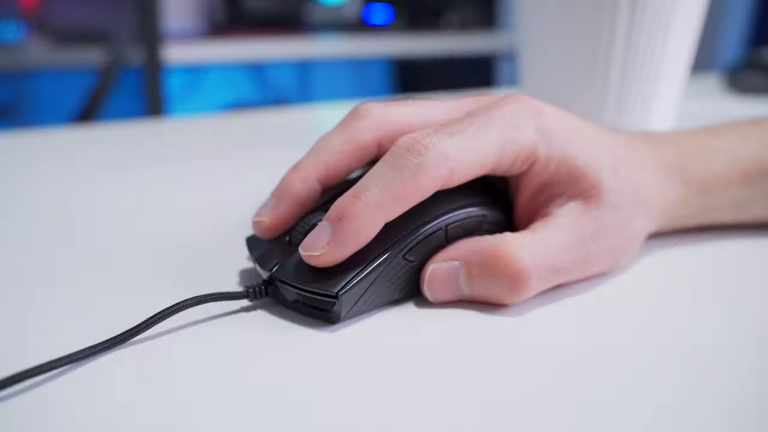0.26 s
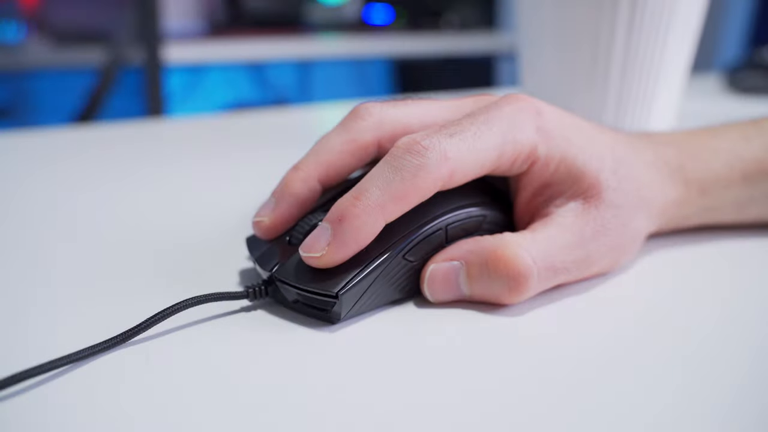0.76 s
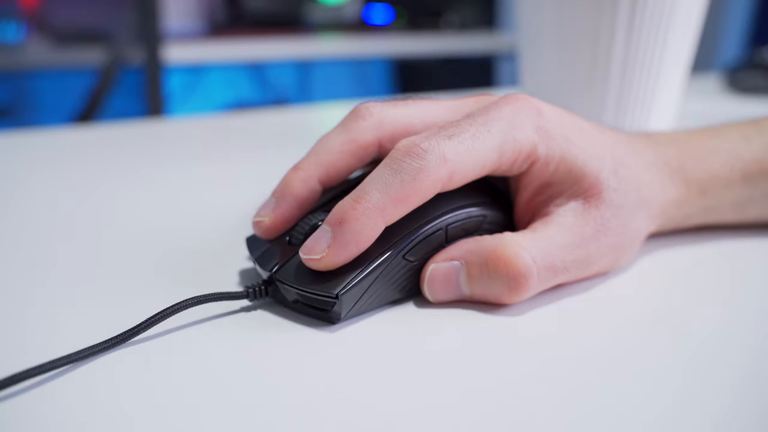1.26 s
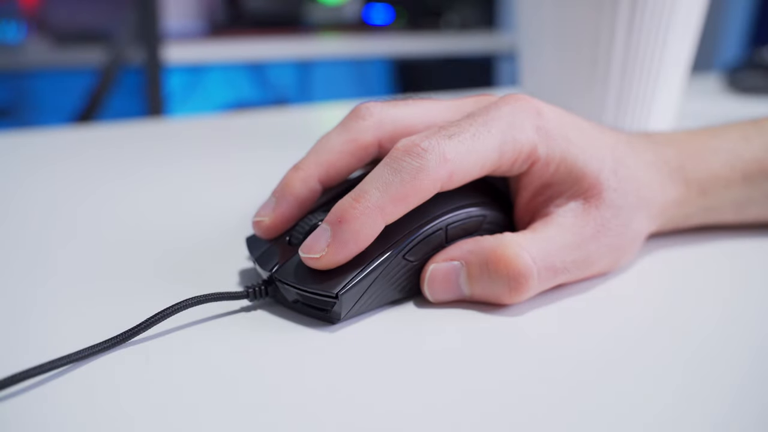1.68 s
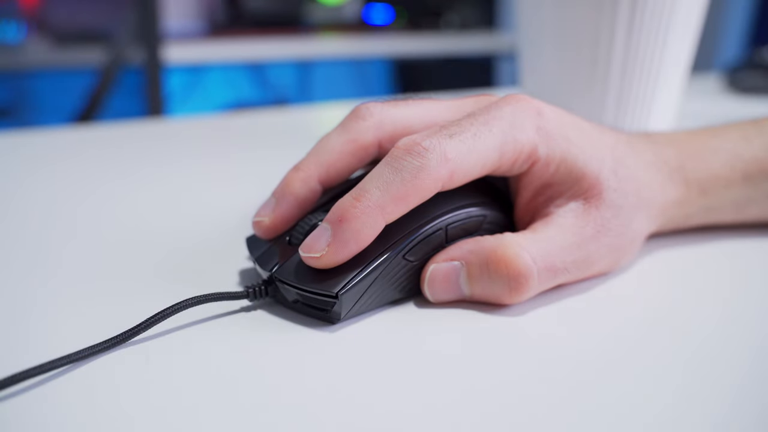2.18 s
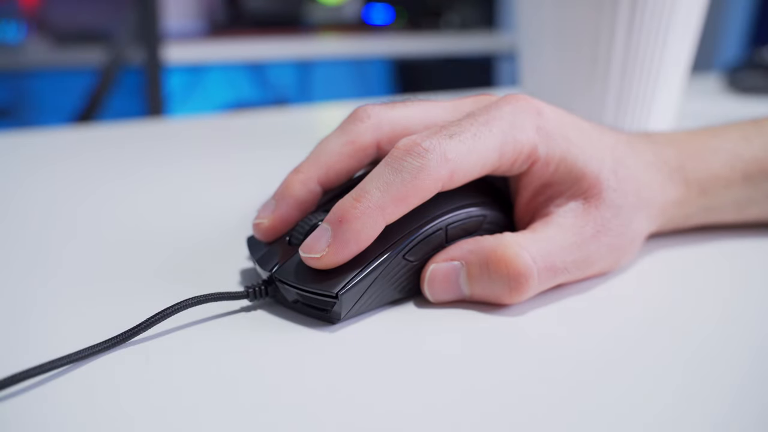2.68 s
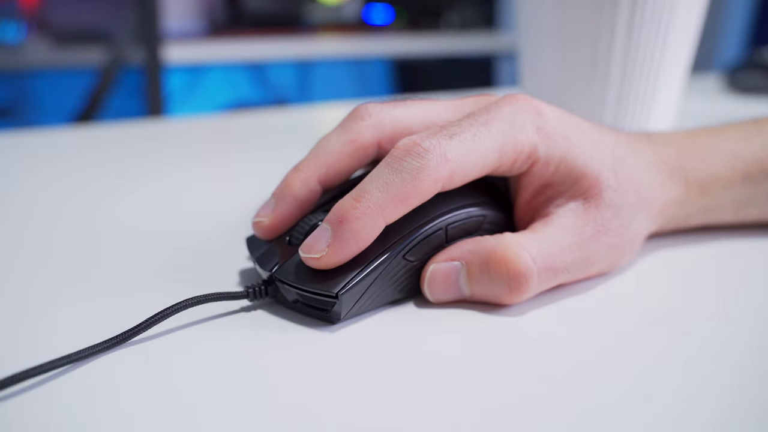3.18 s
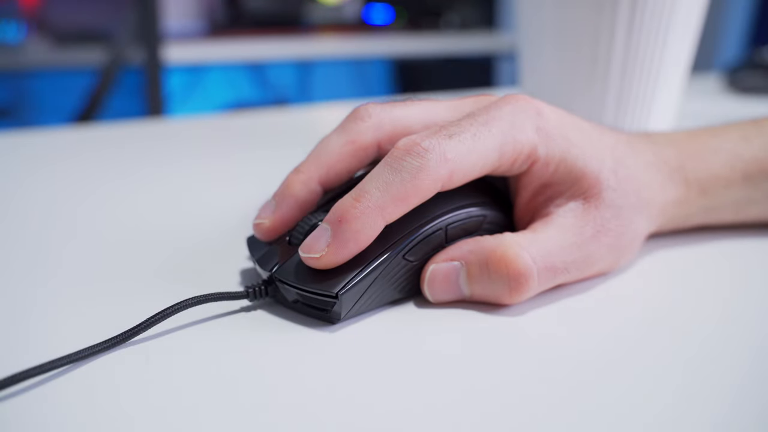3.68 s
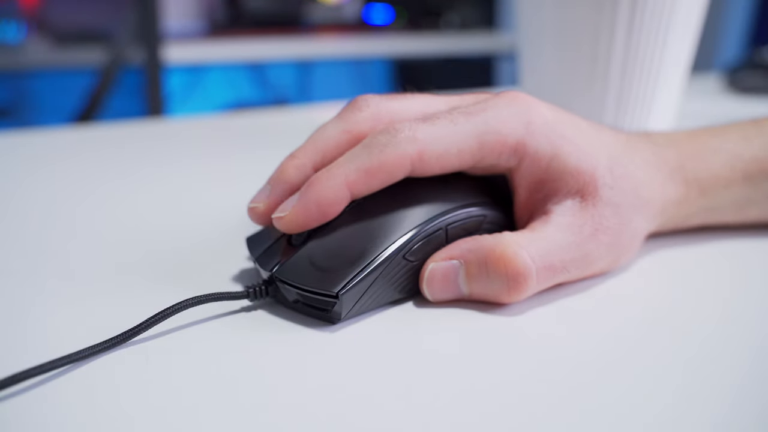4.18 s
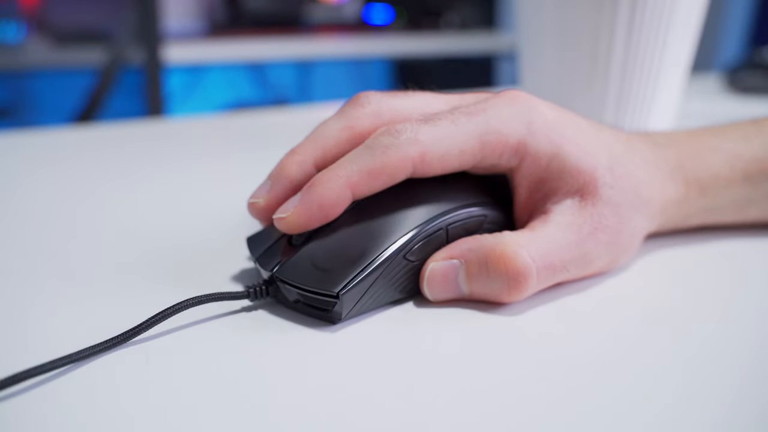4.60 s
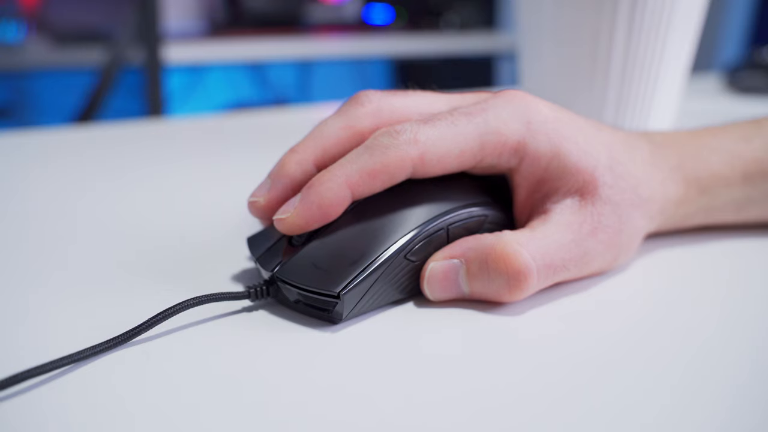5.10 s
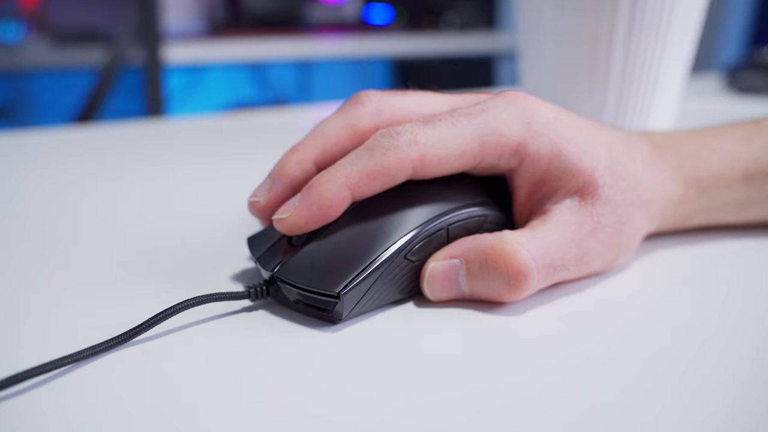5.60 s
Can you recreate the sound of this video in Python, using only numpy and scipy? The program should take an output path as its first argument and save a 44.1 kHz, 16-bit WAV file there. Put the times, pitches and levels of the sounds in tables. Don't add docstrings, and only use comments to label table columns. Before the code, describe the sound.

A wired plastic mouse on a desk is clicked steadily, close to the microphone in a small quiet room. Five bright left-button press-release pairs come first, then six slightly different right-button pairs, with faint skin pops between. A tiny finger slip precedes the last right release, then five duller, quieter wheel clicks follow over a faint constant fan hum.

```python
import sys
import numpy as np
from scipy import signal
from scipy.fft import rfft, irfft
from scipy.io import wavfile
from scipy.ndimage import uniform_filter1d

SR = 44100
rng = np.random.default_rng(int(sys.argv[2]) if len(sys.argv) > 2 else 0)


def amplitude_ratio(level_db):
    exponent = np.asarray(level_db, float) / 20
    return 10 ** exponent


def wav_out(sig):
    wavfile.write(sys.argv[1], SR, np.round(np.clip(np.atleast_2d(sig).T, -1, 1) * 32767).astype(np.int16))


N = 257984

# pitch_hz [Hz], level_db [dB per Hz]
AIR_SPECTRUM = [(20, -3), (45, -14), (90, -10.5), (180, -9.5), (250, -12), (370, -11), (495, -10.5),
                (520, -6), (640, -9.5), (680, -14), (790, -14), (900, -15.5), (1080, -15), (1200, -21),
                (1390, -18.5), (1450, -26.5), (3600, -32), (7000, -37), (15700, -37.5), (16000, -56)]
AIR_DB = -61.5
# pitch_hz [Hz], level_db [dB rms]
HUM_TONES = [(60.05, -59.5), (120, -74.5), (180, -71), (238.5, -78.5), (300, -77.5), (397.5, -84),
             (449.5, -79.5), (477.1, -80.5), (524.5, -73), (564.6, -69.5), (599.4, -71.5), (674.3, -83),
             (848, -76.5), (1829, -95)]
# pitch_hz [Hz], width_hz [Hz], level_db [dB rms]
FAN_TONES = [(340, 14, -78), (424, 5, -77), (540, 14, -77), (633, 8, -77), (1295, 40, -85), (1372, 25, -81),
             (1890, 20, -92), (2465, 5, -91), (3500, 250, -82)]

# pitch_hz [Hz], t60_s [s]
ROOM_T60 = [(300, 0.51), (1000, 0.16), (4000, 0.25), (6000, 0.33), (8000, 0.27), (16000, 0.21)]
# delay_ms [ms], level_db [dB over the diffuse tail]
ECHOES = [(9.7, 5), (10.8, 5), (13.2, 8), (14.6, 7.5), (17.3, 3), (19.7, 5), (27.4, 7.5), (29.3, 5),
          (33.5, 3)]
ROOM_START_MS, ECHO_SCATTER_MS = 9.5, 0.7
# delay_ms [ms], level_db [dB], low_hz [Hz], high_hz [Hz]
REPLIES = [(6.8, -8, 150, 700), (13, -14, 150, 700), (22.5, -11, 150, 700), (14.2, -28, 13000, 16800),
           (30, -16, 150, 500)]

SLIP_S, CREEP_S, CREEP_DB_PER_S, DRAG_S = 3.8765, 0.029, 600, 0.011
SLIP_DB, DRAG_DB = -55.5, -69
# start_s [s],
# level_db [dB peak], pitch_hz [Hz]
PEELS = [(0.582, -47.5, 945), (1.079, -51, 900), (1.426, -49, 910), (1.854, -52.5, 920),
         (2.064, -48.5, 810), (3.088, -52, 940), (3.561, -38, 896), (3.8745, -47, 5430),
         (3.8755, -56, 7700), (3.877, -48.5, 810), (3.876, -49, 130), (3.9325, -45, 890),
         (3.9775, -64, 2600), (4.2597, -49.5, 1070), (4.4115, -66, 4800), (4.4253, -67, 4400),
         (4.43, -67, 4300), (4.4315, -66, 5700)]
PEEL_SWELL_S, PEEL_PARTS = 0.0024, [(1, 2.5), (1.75, -13), (2.4, -18)]

# pitch_hz [Hz], level_db [dB], t60_s [s]
LEFT_DOWN_MODES = [(198, -30, 0.024), (583, -35.7, 0.0283), (727, -30.4, 0.0126), (1349, -18.6, 0.0046),
                   (1659, -35.3, 0.03), (2053, -43.1, 0.017), (2078, -24.7, 0.0032), (2734, -18.4, 0.0167),
                   (3151, -36.6, 0.014), (3195, -59.9, 0.0046), (3544, -22.9, 0.0072), (3631, -27.1, 0.017),
                   (4041, -20.4, 0.0165), (4342, -15.7, 0.0093), (4903, -19.5, 0.015),
                   (5520, -18.9, 0.0081), (6239, -24.8, 0.0108), (6700, -24, 0.006), (7317, -13, 0.0117),
                   (7866, -4.4, 0.0081), (8564, -6.9, 0.0064), (9275, -23.5, 0.0081),
                   (10159, -20.6, 0.0073), (10521, -10.1, 0.0032), (12577, -6.9, 0.0099),
                   (13602, -14.9, 0.0063), (14349, -11.6, 0.0063), (15105, -14, 0.0034),
                   (15800, -22, 0.003)]
LEFT_UP_MODES = [(196, -35.5, 0.028), (560, -35.7, 0.03), (782, -36.0, 0.0265), (1208, -27.0, 0.0062),
                 (1280, -33.9, 0.03), (1619, -39.5, 0.03), (2195, -30.5, 0.015), (2427, -20.2, 0.017),
                 (2826, -25.4, 0.0168), (3261, -28.4, 0.0093), (3582, -35.3, 0.017), (3849, -39.6, 0.017),
                 (4087, -34.3, 0.017), (4620, -21.3, 0.006), (5207, -37.2, 0.017), (5794, -31.0, 0.005),
                 (6031, -27.7, 0.017), (6805, -10.4, 0.0046), (8367, -5.3, 0.003), (9366, -9.2, 0.0031),
                 (9479, -25.1, 0.0099), (10349, -12.6, 0.007), (11427, -3.2, 0.004), (12482, -17.0, 0.0077),
                 (13245, -24.9, 0.0117), (14090, -21.0, 0.0096), (14917, -6.7, 0.0069),
                 (15222, -11.6, 0.0071), (16150, -27, 0.005)]
RIGHT_DOWN_MODES = [(173, -35, 0.025), (589, -25.5, 0.0142), (964, -22.4, 0.0038), (1694, -28.0, 0.0067),
                    (2003, -23.2, 0.0056), (2193, -29.2, 0.017), (2528, -27.6, 0.0048),
                    (2812, -34.4, 0.017), (2851, -34.0, 0.017), (3562, -18.5, 0.0061),
                    (4039, -15.3, 0.0092), (4568, -16.8, 0.015), (5201, -18.2, 0.0055),
                    (5472, -28.5, 0.0099), (5806, -33.2, 0.0134), (6432, -21.0, 0.011),
                    (7147, -7.7, 0.0126), (7880, -8.7, 0.0116), (9107, -37.2, 0.017), (9321, -24.7, 0.01),
                    (9891, -16.6, 0.0047), (10763, -20.0, 0.0062), (12479, -13.4, 0.008),
                    (13270, -21.1, 0.0059), (13603, -33.2, 0.017), (14158, -25.9, 0.0067),
                    (14749, -21.8, 0.0046), (15654, -17.6, 0.007)]
RIGHT_UP_MODES = [(252, -41.6, 0.03), (525, -28.8, 0.0138), (1012, -22.8, 0.0047), (1674, -36.0, 0.0178),
                  (2146, -33.4, 0.0089), (2690, -22.7, 0.0154), (2801, -19.6, 0.0101), (2875, -24.2, 0.017),
                  (3692, -21.0, 0.017), (4133, -23.0, 0.0099), (4541, -32.3, 0.017), (5230, -22.4, 0.0094),
                  (5760, -27, 0.012), (7149, -2.2, 0.0135), (7818, 0.4, 0.0077), (8850, -11.5, 0.007),
                  (9213, -32.8, 0.0137), (10121, -24.3, 0.0044), (10364, -28.8, 0.0077),
                  (11005, -30.4, 0.0098), (11626, -18.9, 0.003), (12413, -19.2, 0.0086),
                  (12948, -15.0, 0.0082), (13361, -18.6, 0.0083), (13616, -32.0, 0.0153),
                  (14335, -19.8, 0.0069), (14917, -22.2, 0.0121), (15506, -27, 0.0062), (3380, -31, 0.008)]
WHEEL_DOWN_MODES = [(28, -36, 0.0104), (354, -15.5, 0.0036), (687, -42.6, 0.0299), (983, -25.6, 0.0175),
                    (1296, -33.6, 0.0134), (1730, -43.6, 0.03), (1769, -40.1, 0.0127), (2165, -29.1, 0.017),
                    (2596, -10.6, 0.0105), (2948, -2.5, 0.0081), (3349, -6.2, 0.0041), (3797, -24.4, 0.017),
                    (4130, -23.0, 0.0076), (4796, -15.5, 0.0096), (5301, -28.5, 0.017),
                    (6022, -16.1, 0.0101), (7504, -9.0, 0.0068), (8185, -26.1, 0.0106),
                    (8585, -19.3, 0.0143), (10046, -18.3, 0.0107), (10477, -28.0, 0.0169),
                    (10697, -20.3, 0.0067), (10880, -18.3, 0.0076), (11692, -11.5, 0.003),
                    (13131, -28.4, 0.0099), (14182, -18.4, 0.0036), (14988, -21.5, 0.003),
                    (15250, -37.0, 0.0085)]
WHEEL_UP_MODES = [(328, -19.2, 0.0099), (551, -22.4, 0.0063), (980, -31.0, 0.0257), (1257, -32.2, 0.0125),
                  (1760, -33.4, 0.0233), (1787, -27.7, 0.009), (2124, -23.5, 0.0167), (2516, -13.7, 0.017),
                  (2856, -19.4, 0.017), (2941, -14.4, 0.0118), (3547, -10.7, 0.0031), (4102, -21.2, 0.0107),
                  (4787, -12.7, 0.0113), (5239, -21.4, 0.017), (6053, -9.6, 0.0086), (6820, -11.5, 0.0056),
                  (7584, -10, 0.017), (8282, -15.3, 0.0073), (8589, -18.5, 0.0149), (9054, -17.9, 0.0068),
                  (9555, -21.8, 0.0138), (10425, -18.2, 0.0088), (11009, -22.4, 0.0135),
                  (11466, -15.4, 0.0068), (12262, -14.5, 0.0104), (13257, -31.5, 0.0097),
                  (14193, -31.3, 0.0058), (15524, -27.5, 0.0084)]
# pitch_hz [Hz], level_db [dB], t60_s [s]
LEFT_DOWN_THUD, LEFT_UP_THUD = (110, -46, 0.03), (100, -46, 0.03)
RIGHT_UP_THUD, WHEEL_DOWN_THUD = (114, -43, 0.03), (173, -32, 0.05)
# delay_ms [ms after first touch], level_db [dB]
LEFT_DOWN_BOUNCES = [(0.0, -2.9), (0.31, 2.0), (0.51, 0.9), (1.0, -21.7), (1.63, -12.3)]
LEFT_UP_BOUNCES = [(0.0, -4.7), (0.3, 4.4), (0.51, 2.8), (1.0, -4.9), (1.56, -13.7)]
RIGHT_DOWN_BOUNCES = [(0.0, -1.3), (0.2, 2.8), (0.55, -3.1), (0.93, -12.7), (2.28, -23.4)]
RIGHT_UP_BOUNCES = [(0.0, -0.3), (0.31, 2.6), (0.5, 2.1), (0.94, -5.7), (1.6, -30.0)]
WHEEL_DOWN_BOUNCES = [(0.0, -8.5), (0.31, -0.2), (0.5, 2.5), (1.02, -12.0), (1.63, -28.4)]
WHEEL_UP_BOUNCES = [(0.0, -11.9), (0.3, 3.2), (0.5, -0.3), (1.0, -15.1), (1.59, -29.8)]
# pitch_hz [Hz], level_db [dB per Hz]
LEFT_DOWN_SPREAD = [(250, -12), (600, -5), (1100, -15), (1510.0, -6.5), (1680.0, -14), (1890.0, -16),
                    (2500.0, -14), (3600, -5), (4300.0, 1.5), (4950.0, -4), (5640.0, -2.5), (6030.0, -10.1),
                    (6930.0, -9), (7280.0, -6), (7580.0, -6), (7880.0, -4), (8830.0, -11), (9730.0, -15),
                    (10720.0, -15), (11800.0, -12), (12300.0, -4), (13520.0, -12), (14210.0, -10),
                    (14600.0, -23), (15250.0, -15), (15760.0, -20), (16050, -44.5)]
LEFT_UP_SPREAD = [(250, -31), (600, 2), (1100, -1), (1510.0, -8), (1680.0, -18), (1890.0, -12.5),
                  (2200.0, -8), (2500.0, -13), (4130.0, -2), (5300.0, -8.5), (6120.0, -3), (6550.0, -7.5),
                  (7280.0, 4), (7970.0, -13), (8350.0, 1), (8790.0, -11), (9650.0, -3), (10810.0, -13.5),
                  (11630.0, 2), (12020.0, -5.5), (12360.0, -20.5), (12750.0, -6), (13390.0, -8),
                  (15200.0, -7), (15760.0, -19.5), (16050, -44)]
RIGHT_DOWN_SPREAD = [(250, -33), (600, -2.5), (1100, -11.5), (1510.0, -11.5), (1640.0, -13),
                     (2150.0, -11.5), (3140.0, -11.5), (3700.0, 0.5), (4180.0, 1.2), (4740.0, -2),
                     (5600.0, -7), (7580.0, -10.5), (8010.0, 0.3), (9090.0, -15), (9730.0, -9.4),
                     (10850.0, -8.5), (11760.0, -26), (12060.0, -13.5), (12490.0, -13), (12880.0, -13.5),
                     (14080.0, -9), (14560.0, -16), (15370.0, -18.5), (15630.0, -6.5), (15760.0, -18),
                     (16050, -49)]
RIGHT_UP_SPREAD = [(250, -15), (600, -5.5), (1100, -8), (1510.0, -14), (2670.0, -14), (3320.0, -13),
                   (3650, 3.5), (4100, 0), (4440.0, -5), (4950.0, -17), (5300.0, -6.5), (5860.0, -10),
                   (6240.0, -14.5), (6900, -5), (7320.0, -0.5), (7800, -1.5), (8350.0, -3), (8910.0, -14.5),
                   (10080.0, -14.7), (10470.0, -22), (12140.0, -12), (13780.0, -11), (14170.0, -10),
                   (14560.0, -22), (14990.0, -23), (15330.0, -21.7), (15590.0, -21.5), (15760.0, -18.5),
                   (16050, -42)]
WHEEL_DOWN_SPREAD = [(250, -33), (600, 0), (1100, -2), (1510.0, -35), (1680.0, -15), (2240.0, -9),
                     (3490.0, -5), (4260.0, -0.5), (5170.0, -4), (5770.0, 2.5), (6850.0, -10), (7360.0, -6),
                     (7620.0, -11), (8740.0, -12), (9000.0, -17), (9350.0, -6), (9820.0, -0.5),
                     (10550.0, -9), (11020.0, -11), (11970.0, -11.7), (13090.0, -29), (14250.0, -18.5),
                     (14940.0, -28.5), (15550.0, -27.8), (15760.0, -34.1), (16050, -45)]
WHEEL_UP_SPREAD = [(250, -24.5), (600, -15), (1100, -10), (1510.0, -19), (1720.0, -21), (2200.0, -6.5),
                   (3530.0, -9.5), (4260.0, -2.5), (5730.0, 0.8), (7360.0, -14), (9000.0, -4.5),
                   (9560.0, -4), (9860.0, -18), (10340.0, -11), (11200.0, -11), (11500.0, -6),
                   (11760.0, -12.2), (12140.0, -10.2), (12620.0, -26), (13260.0, -21.4), (13570.0, -31),
                   (14250.0, -26), (15290.0, -33), (15590.0, -24.1), (15760.0, -27.5), (16050, -45)]
# start_s [s], level_db [dB], treble_db [dB], top_db [dB], middle_db [dB]
LEFT_DOWN = [
    (-0.22, -13, 4, 7, 0),
    (0.1477, -15, 1, -3, 0.5),
    (0.5531, -15.0, 1, -2, .4),
    (0.9198, -14.5, 2, 0.5, 0.6),
    (1.2647, -15, 1, -2.5, 0.2),
    (1.6317, -15.5, 1.2, -.6, 0.2),
]
LEFT_UP = [
    (-0.09, -15, 0, 0, 0),
    (0.2716, -14.5, 0.1, 0.19, 0.34),
    (0.706, -15, 0.1, .3, 0.37),
    (1.0507, -15, 0.2, .6, 0.72),
    (1.3987, -14.5, 0.077, 1.2, 0.21),
    (1.7845, -15.5, -0.3, 1.2, 1.1),
]
RIGHT_DOWN = [
    (2.0413, -13, -0.62, 1.2, -0.032),
    (2.396, -13.5, -0.5, .3, 0.33),
    (2.7352, -13, 0.2, 0.43, -0.85),
    (3.0588, -13.5, 0.22, -1.2, -0.067),
    (3.395, -13, 0.8, -1.5, -0.48),
    (3.7399, -13.5, -0.86, .3, 0.16),
]
RIGHT_UP = [
    (2.1803, -14, 1.8, -4.5, 0.4),
    (2.5389, -13.5, 0.38, -2, 0.14),
    (2.8808, -14, 1.1, -5, -1.4),
    (3.2154, -14, 2, -4, -1.4),
    (3.5373, -13.5, 0.76, 1, -1.2),
    (3.9008, -13, -1.1, 4.4, -0.81),
]
WHEEL_DOWN = [
    (4.2597, -20.2, -0.8, 3.2, -0.26),
    (4.7981, -20.5, -0.054, 4, 0.6),
    (5.1264, -22, 1.1, -3.1, 1.5),
    (5.393, -22, 1.1, .1, 1),
    (5.6757, -22, -0.57, -.6, -0.95),
]
WHEEL_UP = [
    (4.4546, -24, 1.1, .6, 0.97),
    (4.9717, -23.5, 0.71, -1, .6),
    (5.276, -24.5, 1.1, -2.2, 1.2),
    (5.5398, -24.5, 1, -1, 1.6),
    (5.8226, -24, 1.8, -3.1, .3),
]
LEFT_LOOSE, RIGHT_LOOSE, WHEEL_LOOSE = 0.3, 0.55, 0.7


def rms_one(x):
    return x / np.sqrt(np.mean(x ** 2) + 1e-20)


def at_hz(points, hz):
    table_hz, values = np.array(points)[:, :2].T
    return np.interp(np.log(hz), np.log(table_hz), values)


def band_pass(x, low_hz, high_hz):
    return signal.sosfilt(signal.butter(2, [low_hz, high_hz], "band", fs=SR, output="sos"), x)


def coloured(spectrum):
    hz = np.maximum(np.arange(N // 2 + 1) * SR / N, 1)
    white = rfft(rng.standard_normal(N))
    return rms_one(irfft(white * amplitude_ratio(at_hz(spectrum, hz)), N))


def background():
    t = np.arange(N) / SR
    out = amplitude_ratio(AIR_DB) * coloured(AIR_SPECTRUM)
    for hz, level_db in HUM_TONES:
        phase = rng.random()
        out += np.sqrt(2) * amplitude_ratio(level_db) * np.sin(2 * np.pi * (hz * t + phase))
    for hz, width_hz, level_db in FAN_TONES:
        r = np.exp(-np.pi * width_hz / SR)
        poles = [1, -2 * r * np.cos(2 * np.pi * hz / SR), r * r]
        whine = signal.lfilter([1, 0, -1], poles, rng.standard_normal(N + SR))
        out += amplitude_ratio(level_db) * rms_one(whine[SR:])
    return out


def room():
    t = np.arange(SR // 2) / SR
    ms = 1000 * t
    tail = 0
    edges_hz = 200 * 2 ** np.arange(0, 6.6, 0.5)
    for low, high in zip(edges_hz, edges_hz[1:]):
        band = band_pass(rng.standard_normal(len(t)), low, high)
        local_power = uniform_filter1d(band ** 2, size=60 + int(2 * SR / (high - low)))
        band = band * (np.mean(band ** 2) / (local_power + 1e-9)) ** 0.4
        t60 = at_hz(ROOM_T60, np.sqrt(low * high))
        tail = tail + band * amplitude_ratio(-60 * t / t60)
    swell = np.clip(ms / ROOM_START_MS, 0, 1) ** 3
    for delay_ms, level_db in ECHOES:
        after = np.clip(ms - delay_ms, 0, None)
        rise = np.clip(2 * after, 0, 1)
        swell = swell + (amplitude_ratio(level_db) - 1) * rise * np.exp(-after / ECHO_SCATTER_MS)
    low_pass = signal.cheby2(14, 50, 16700, fs=SR, output="sos")
    return swell * signal.sosfilt(low_pass, tail)


def slide():
    after = np.arange(N) / SR - SLIP_S
    level_db = np.where(after < 0, SLIP_DB + CREEP_DB_PER_S * after, DRAG_DB)
    gain = amplitude_ratio(level_db) * (after > -CREEP_S) * (after < DRAG_S)
    return gain * coloured([(1000, -25), (3000, -2.5), (5500, -7.5), (8000, -9.0), (12000, -19.5),
                            (15700, -24.0), (16000, -46.5)])


def peels():
    out = np.zeros(N)
    t = np.arange(800) / SR
    for start_s, level_db, hz in PEELS:
        at = round(start_s * SR)
        rise = t / min(PEEL_SWELL_S, 6.1 / hz)
        swell = rise ** 3 * np.exp(3 - 3 * rise)
        tone = sum(amplitude_ratio(part_db) * np.sin(2 * np.pi * part * hz * t) for part, part_db in PEEL_PARTS)
        out[at:at + len(t)] += amplitude_ratio(level_db) * swell * tone
    return out


def taps(rows, size):
    out = np.zeros(size)
    for ms, level_db in rows:
        at = np.clip(ms, 0, None) * SR / 1000
        out[int(at):int(at) + 2] += amplitude_ratio(level_db) * np.array([1 - at % 1, at % 1])
    return out


def ringing(modes, size=2600):
    t = np.arange(size) / SR
    out = np.zeros(size)
    for k, (hz, level_db, t60) in enumerate(modes):
        out += (-1) ** k * amplitude_ratio(level_db - 60 * t / t60) * np.sin(2 * np.pi * hz * t)
    return out


def touch_db(hz, treble_db, top_db, middle_db):
    return treble_db * (hz > 9000) + top_db * (hz > 13400) + middle_db * (hz > 2500) * (hz < 6600)


def replies(sound):
    out = sound.copy()
    for ms, level_db, low_hz, high_hz in REPLIES:
        lag = round(ms * SR / 1000)
        out[lag:] += amplitude_ratio(level_db) * band_pass(sound[:-lag], low_hz, high_hz)
    return out


def snaps(events, modes, bounces, spread, spread_db, walls, loose):
    hz, mode_db, t60 = np.transpose(modes)
    out = np.zeros(SR + N + len(walls))
    contact = taps(bounces, size=120)
    bins_hz = np.maximum(np.arange(len(walls) // 2 + 1) * SR / len(walls), 1)
    walls_spectrum = rfft(walls)
    plain = uniform_filter1d(np.abs(walls_spectrum) ** 2, size=250) ** 0.5
    middle = np.median(plain)
    levelling = middle / np.maximum(plain, 0.31 * middle)
    reverb = walls_spectrum * amplitude_ratio(spread_db + at_hz(spread, bins_hz)) * levelling
    wobble = loose * rng.standard_normal((len(events), 2, len(modes)))
    order = np.argsort(hz)
    for (start_s, level_db, *touch), (wobble_db, detune) in zip(events, wobble):
        at = SR + round(start_s * SR)
        struck_db = mode_db + wobble_db + touch_db(hz, *touch)
        rung = ringing(zip(hz * (1 + 0.003 * detune), struck_db, t60))
        direct = replies(np.convolve(contact, rung))
        out[at:at + len(direct)] += amplitude_ratio(level_db) * direct
        scatter_db = np.interp(bins_hz, hz[order], 1.5 * wobble_db[order])
        shade_db = touch_db(bins_hz, *touch) + scatter_db
        reflected = irfft(reverb * amplitude_ratio(shade_db), len(walls))
        out[at:at + len(walls)] += amplitude_ratio(level_db) * reflected
    return out[SR:SR + N]


def scene():
    walls = room()
    mouse = snaps(LEFT_DOWN, LEFT_DOWN_MODES + [LEFT_DOWN_THUD], LEFT_DOWN_BOUNCES, LEFT_DOWN_SPREAD,
                  spread_db=-24.5, walls=walls, loose=LEFT_LOOSE)
    mouse += snaps(LEFT_UP, LEFT_UP_MODES + [LEFT_UP_THUD], LEFT_UP_BOUNCES, LEFT_UP_SPREAD,
                   spread_db=-28, walls=walls, loose=LEFT_LOOSE)
    mouse += snaps(RIGHT_DOWN, RIGHT_DOWN_MODES, RIGHT_DOWN_BOUNCES, RIGHT_DOWN_SPREAD,
                   spread_db=-28.5, walls=walls, loose=RIGHT_LOOSE)
    mouse += snaps(RIGHT_UP, RIGHT_UP_MODES + [RIGHT_UP_THUD], RIGHT_UP_BOUNCES, RIGHT_UP_SPREAD,
                   spread_db=-25.0, walls=walls, loose=RIGHT_LOOSE)
    mouse += snaps(WHEEL_DOWN, WHEEL_DOWN_MODES + [WHEEL_DOWN_THUD], WHEEL_DOWN_BOUNCES, WHEEL_DOWN_SPREAD,
                   spread_db=-25.5, walls=walls, loose=WHEEL_LOOSE)
    mouse += snaps(WHEEL_UP, WHEEL_UP_MODES, WHEEL_UP_BOUNCES, WHEEL_UP_SPREAD,
                   spread_db=-21.5, walls=walls, loose=WHEEL_LOOSE)
    return (mouse + peels() + slide() + background())[None]


def band_limit(x):
    return signal.sosfilt(signal.butter(12, 17100, fs=SR, output="sos"), x)


def record(dry):
    low_pass = signal.ellip(6, 0.5, 45, 16400, fs=SR, output="sos")
    mix = signal.sosfilt(low_pass, dry)
    return band_limit(mix)


dry = scene()
out = record(dry)
wav_out(out)
```